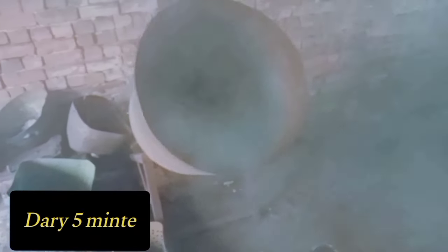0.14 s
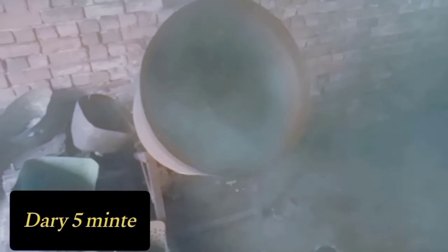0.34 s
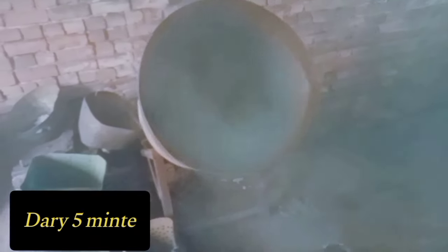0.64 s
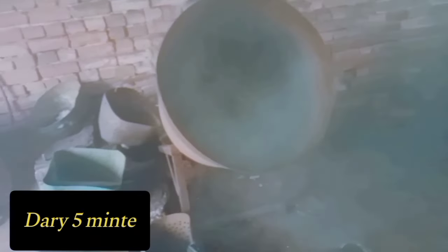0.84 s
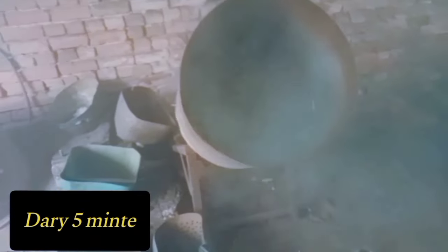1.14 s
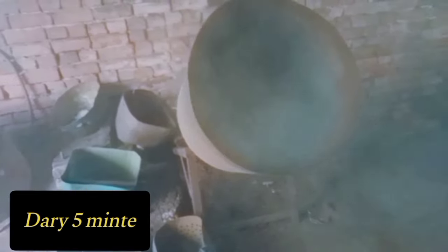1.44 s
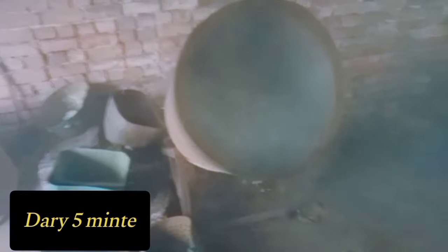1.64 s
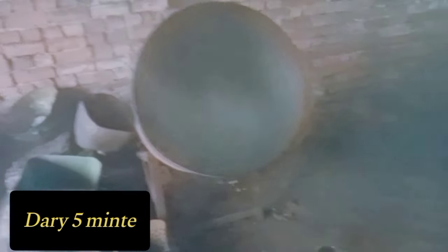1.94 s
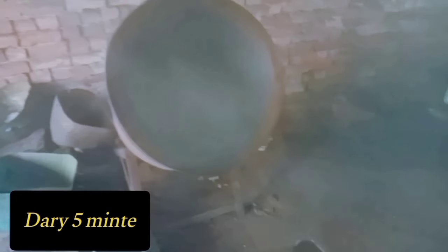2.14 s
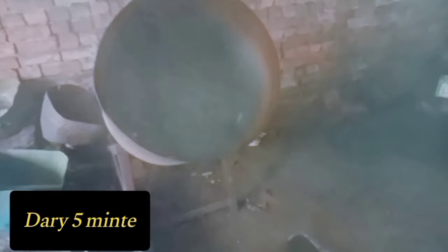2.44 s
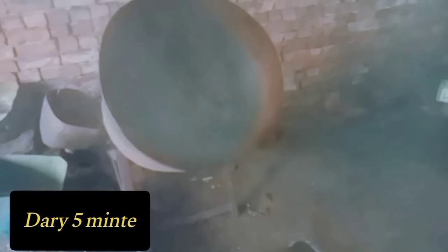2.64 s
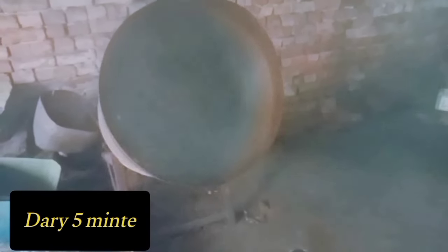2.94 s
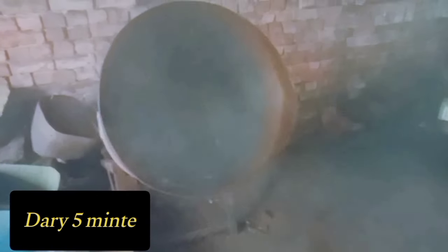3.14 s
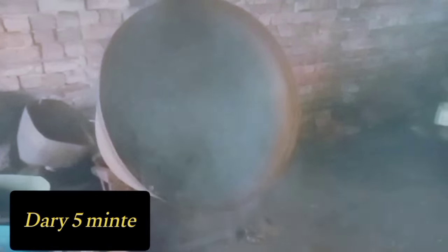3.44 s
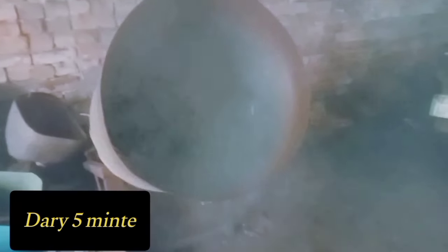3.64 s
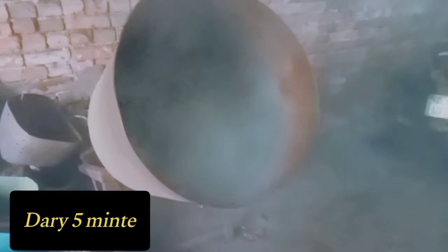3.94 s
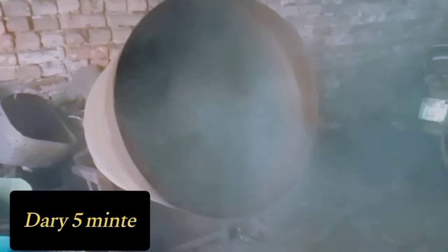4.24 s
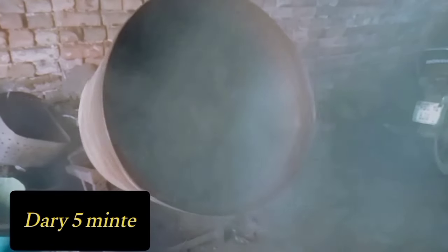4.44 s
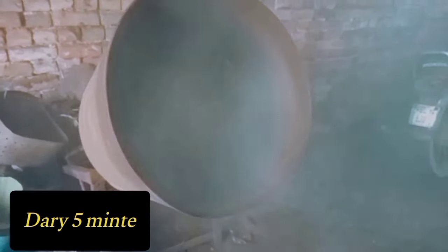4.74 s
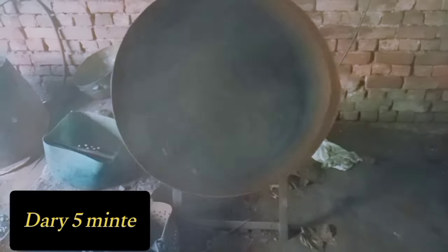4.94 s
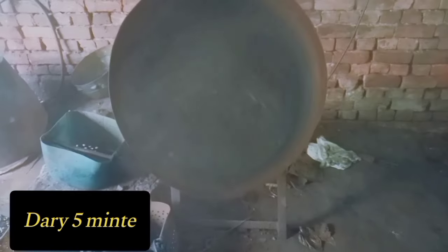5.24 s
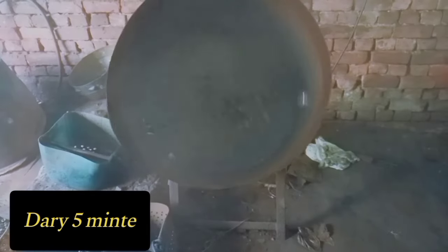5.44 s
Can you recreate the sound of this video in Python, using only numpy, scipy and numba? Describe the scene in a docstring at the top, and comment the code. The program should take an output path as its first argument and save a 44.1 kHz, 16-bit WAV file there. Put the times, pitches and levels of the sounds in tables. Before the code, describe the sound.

Small steel pieces tumble in a turning steel drum with a dense, hissing metallic rattle, while air puffs on the microphone.

```python
"""Small steel pieces tumble in a turning steel drum in a brick workshop, close to a hand-held microphone.
From the start, thousands of collisions a second ring the wall and the pieces and merge into a hissing
rattle over the drum's low roll. All along it surges as the load slides, heavier pieces clank, and puffs
of air pop on the microphone, thickest around 2.8 s and 4 s. At 4.7 s the sound cuts and fades back in."""
import sys
import numpy as np
from scipy import signal
from scipy.fft import rfft, irfft, next_fast_len
from scipy.io import wavfile
from scipy.ndimage import uniform_filter1d
from numba import njit

SR = 44100
rng = np.random.default_rng(int(sys.argv[2]) if len(sys.argv) > 2 else 0)


def unload_wav(signal):
    """Save mono or channel-first audio to the path in sys.argv[1] as 16-bit WAV at rate SR, clipped to [-1, 1]."""
    wavfile.write(
        sys.argv[1],
        SR,
        np.round(np.clip(np.atleast_2d(signal).T, -1, 1) * 32767).astype(np.int16),
    )


N = 246078

# EQ of the drum rolling on its frame: (frequency [Hz], gain [dB])
RUMBLE_EQ = [(15, -68), (25, -29), (168, -3.5), (263, -13.5), (479, -10), (583, -19), (798, -12), (900, -6),
             (1170, -24), (1980, -120)]
# puffs of air on the microphone: (time [s], level [dB], pace [Hz]); the swing runs at 0.7 of the pace
AIR_PUFFS = [(0.133, -16, 141.0), (0.92, -27, 171), (1.206, -19, 296.0), (1.238, -20, 250),
             (1.384, -22, 250), (1.451, -9.5, 226), (1.837, -25, 256.0), (1.924, -22, 200),
             (2.379, -23, 132.0), (2.593, -16.5, 134.0), (2.624, -17, 137), (2.726, -17, 202),
             (2.745, -14, 161), (2.756, -7.5, 215), (2.772, -17, 200), (2.779, -14, 135.0),
             (2.789, -12.5, 185.0), (2.815, -19, 151.0), (2.907, -12, 144), (3.535, -23, 140),
             (3.592, -15.5, 144), (3.728, -17, 216), (3.74, -23, 132.0), (3.754, -13.5, 161.0),
             (3.782, -17, 148.0), (3.843, -16, 180), (3.853, -17, 155.0), (3.863, -19, 223.0),
             (3.891, -15.5, 152), (3.898, -12, 128), (3.966, -16, 228.0), (3.978, -13, 153.0),
             (3.989, -16, 163.0), (3.997, -14.5, 147), (4.025, -20, 319.0), (4.104, -19, 238.0),
             (4.112, -18, 190.0), (4.133, -17, 139), (4.147, -15, 196.0), (4.158, -19.5, 115.0),
             (4.316, -12.5, 147), (4.37, -21, 200), (4.382, -13, 154.0), (4.483, -27, 200),
             (4.504, -22, 180), (4.548, -20.5, 138), (4.577, -20, 185.0), (4.815, -15.5, 136),
             (4.901, -24, 270), (4.958, -16.5, 146), (5.034, -17, 134), (5.165, -22, 150)]
# heavier pieces that strike the wall alone: (time [s], level [dB], pitch [Hz])
HEAVY_HITS = [(0.105,-11,3270),(1.235,-8,3100),(1.3032,-11.5,3160),(1.4067,-7,3070),(1.949,-8,3260),(2.0754,-8.5,3580),(2.473,-8,3140),(2.6244,-7.5,3270),(2.6855,-8,3220),(3.116,-12,3050),(3.146,-10,3250),(3.4855,-14,3430),(3.5756,-6.5,3130),(3.6396,-11,2930),(4.101,-15,3250),(4.6209,-15,3300),(5.1543,-14,3300),(5.247,-20,3270)]
# EQ of a collision heard through drum mouth and microphone: (frequency [Hz], gain [dB])
COLLISION_EQ = [(180, -31.5), (300, -23), (756, -17), (1460, -11), (1870, -9), (2030, -8), (3230, -3),
                (3620, -13), (3870, -11.5), (4130, -15), (4800, -18.5), (5290, -20), (5700, -14.5),
                (6240, -13.5), (7300, -21), (7800, -21.5), (12700, -30.5), (15500, -36.5)]
# slow drift between the surges: (time [s], rattle gain [dB], wall boost [dB], treble boost [dB])
LOAD_DRIFT = [(0, -1.04, 2.5, -1.8), (.7, -1.04, 1, 0), (1.3, -1.5, 1, -1), (1.7, -0.7, 1.5, 1),
              (2.08, -2.5, 2.5, .5), (2.5, 0, 1, 0), (3.1, 0, 0, -1), (3.52, -0.3, -0.5, -2),
              (3.85, .5, -0.5, -1.5), (4.25, -1, -0.1, 0), (4.68, 0.5, 0, -3.5), (4.72, -2.5, 0.5, -1),
              (4.85, -2.5, 2.5, -2.5), (5.2, -1.8, 3.5, -1), (5.42, -1, 1, -3.5), (5.58, -.5, 1, -4.5)]
# part of the load slides down at once: (time [s], rattle gain [dB], wall boost [dB], treble boost [dB])
LOAD_SURGES = [(0.131, 1.5, 1, 0), (0.281, 2.5, -1, 2.5), (0.413, 3.5, -3, 1.5), (0.578, 4, -0.5, -2),
               (0.907, 1, 2.5, 0), (1.075, 2.4, 1.2, -5), (1.195, 6, -1.6, -1), (1.382, 2, 1, 1),
               (1.718, 0.9, 0.2, 0), (1.941, 3.3, 0.5, -2), (2.233, 0.5, 2, 1), (2.387, 1.5, -4.5, 0.5),
               (2.606, -1, 5.5, 0.5), (2.752, 2.5, 2, 0), (3.066, 2.6, -3, -3), (3.305, 2, 1, 0.9),
               (3.606, 2, 0, -3.5), (3.87, 2.5, -1, 1.5), (3.993, 1.5, 2.5, -1.5), (4.108, 0.4, 5.5, -2),
               (4.334, 3, -1.8, 0), (4.654, 1.1, 0.5, -2.2), (4.981, 1.8, 1.5, 2), (5.166, 3.5, -1.3, 0),
               (5.292, 3, 0.5, -3), (5.503, 3, -0.1, 2)]
# brief bright sprays of small pieces: (time [s], treble boost [dB])
BRIGHT_SPRAYS = [(.095, 4), (.57, 4), (.745, 5), (.845, 7), (1.335, 6), (1.84, 3), (2.39, 4.5), (3.3, 4)]

RUMBLE_DB, RATTLE_DB = -43, -16
SURGE_RISE_S, SURGE_FALL_S, SPRAY_S = 0.031, 0.046, 0.008
LULL_SHARE, LULL_AFTER_S, LULL_S = 0.2, 0.085, 0.057
WALL_HZ, TAIL_T60_S = 3225, 0.049
CUT_S, FADE_S, LOWPASS_HZ = 4.7, 0.14, 15490


def amp(db):
    """Decibels to gain."""
    return 10 ** (np.asarray(db) / 20)


def unit(x):
    """Scales to an RMS of one."""
    return x / np.sqrt(np.mean(x ** 2) + 1e-20)


def equalise(x, curve):
    """Plays a sound through an EQ curve, at unit RMS."""
    size = next_fast_len(N)
    hz, db = np.transpose(curve)
    gain_db = np.interp(np.log(np.fft.rfftfreq(size, 1 / SR) + 1), np.log(hz + 1), db)
    return unit(irfft(rfft(x, size) * amp(gain_db), size)[:N])


def strikes(per_s, spread_db):
    """Random collisions of either sign, mostly small, a few large."""
    chance, side, luck = rng.random((3, N))
    strength = amp(spread_db * np.minimum(-np.log(1 - luck), 4))
    return strength * np.sign(side - .5) * (chance < per_s / SR)


def frame_rumble():
    """The drum rolls on its frame: a low bed of small bumps over steady noise."""
    roll = rng.standard_normal(N) + 1.65 * unit(strikes(per_s=200, spread_db=4.1))
    return amp(RUMBLE_DB) * equalise(roll, RUMBLE_EQ)


def microphone_pops():
    """Each puff pushes the membrane fast; it swings back once and settles, with a brief rough flutter."""
    out, t = np.zeros(N + 2000), np.arange(2000) / SR
    band = signal.butter(2, [120, 650], "band", fs=SR, output="sos")
    flutters = unit(signal.sosfilt(band, rng.standard_normal((len(AIR_PUFFS), len(t)))))
    for (s, db, pace), flutter in zip(AIR_PUFFS, flutters):
        turns = pace * t
        push = np.sin(np.pi / 2 * np.clip(turns / 0.1, 0, 1)) ** 2 * np.exp(-2.4 * turns)
        swing = push * np.cos(2 * np.pi * (turns - .1) * 0.7)
        at = round(s * SR) - swing.argmax()  # the peak lands on the cue
        out[at:at + len(t)] += amp(db) * (swing + 0.35 * flutter * np.sqrt(push)) / swing.max()
    return out[:N]


def wall_clanks(t60=0.059):
    """A heavier piece rings the wall briefly, as a close pair of tones."""
    out, t = np.zeros(N + 2000), np.arange(2000) / SR
    for s, db, hz in HEAVY_HITS:
        ring = np.sin(2 * np.pi * hz * t) + 0.32 * np.sin(2 * np.pi * 1.2 * hz * t)
        envelope = amp(db - 60 * t / t60) * (1 - np.exp(-t / 0.00025))
        out[round(s * SR):][:len(t)] += envelope * ring
    return out[:N]


@njit
def add_tones(out, starts, sizes, phase_steps, envelope):
    """Adds one dying tone for each hit; a sine follows from its last two samples."""
    for at, size, step in zip(starts, sizes, phase_steps):
        feedback = 2 * np.cos(step)
        old, new = 0., size * np.sin(step)
        for n in range(min(len(envelope), len(out) - at)):
            out[at + n] += envelope[n] * new
            old, new = new, feedback * new - old


def steel_rings(hz, spread_hz, t60, per_s, spread_db):
    """Every collision rings its own spot, the pitches scattered round a common one."""
    out, t = np.zeros(N), np.arange(0, 0.88 * t60, 1 / SR)
    hits = strikes(per_s, spread_db)
    detune = rng.logistic(size=N)
    pitch = abs(hz + spread_hz * detune)
    hits *= np.exp(-(detune / 6) ** 2)  # far from the common pitch, rings are weak
    at = np.flatnonzero(hits)
    envelope = amp(-60 * t / t60) * (1 - np.exp(-t / 0.00077))
    add_tones(out, at, hits[at], 2 * np.pi * pitch[at] / SR, envelope)
    return unit(out)


def load_rides(t):
    """Level, wall and treble rides in dB: slow drift plus each slide's surge and the lull behind it."""
    drift_s, *drifts = np.transpose(LOAD_DRIFT)
    surge_s, *lifts = np.transpose(LOAD_SURGES)
    since = t - surge_s[:, None]
    surge = np.exp(-(since / np.where(since < 0, SURGE_RISE_S, SURGE_FALL_S)) ** 2)
    lull = LULL_SHARE * np.exp(-((since - LULL_AFTER_S) / LULL_S) ** 2)
    drift = np.array([np.interp(t, drift_s, db) for db in drifts])
    return drift + np.array(lifts) @ (surge - lull)


def tumble(x, flicker_db, grit_db, knock_db, patch_db):
    """The load rides level, wall band and treble; clumps add flicker and drifting patches of colour."""
    hz, t, spectrum = signal.stft(x, SR, nperseg=512, noverlap=384)
    level_db, wall_db, treble_db = load_rides(t)
    treble_db += sum(db * np.exp(-((t - s) / SPRAY_S) ** 2) for s, db in BRIGHT_SPRAYS)
    smooth = uniform_filter1d
    flicker = unit(smooth(smooth(rng.standard_normal(len(t)), 9), 7))
    grit = unit(smooth(rng.exponential(size=len(t)) - 1, 10))  # bursts of small pieces
    knock = unit(smooth(rng.standard_normal(len(t)), 6))  # uneven blows on the wall
    patches = unit(smooth(smooth(rng.standard_normal(spectrum.shape), 9, axis=0), 18, axis=1))
    wall_bell = np.exp(-(np.log2((hz + 1) / WALL_HZ) / 0.35) ** 2)[:, None]
    treble_shelf = np.clip(np.log2((hz + 1) / 6000) / .7, 0, 1)[:, None]
    gain_db = level_db + flicker_db * flicker + patch_db * patches
    gain_db += wall_bell * (wall_db + knock_db * knock)
    gain_db += treble_shelf * (treble_db + grit_db * grit)
    return signal.istft(spectrum * amp(gain_db), SR, nperseg=512, noverlap=384)[1][:N]


def drum_rattle():
    """Ticks with a hissing tail of echoes inside the drum, layered with clinks and ringing steel."""
    ticks = strikes(per_s=5000, spread_db=2.67)
    power_decay = amp(-120 * np.arange(4096) / SR / TAIL_T60_S)
    tail_power = signal.oaconvolve(ticks ** 2, power_decay)[:N]
    tails = np.sqrt(abs(tail_power)) * rng.standard_normal(N)
    clinks = steel_rings(hz=3997, spread_hz=2596.5, t60=0.07, per_s=2500, spread_db=3.45)
    clatter = equalise(unit(ticks) + amp(2) * unit(tails) + amp(-3) * clinks, COLLISION_EQ)
    wall = steel_rings(hz=WALL_HZ, spread_hz=200, t60=0.58, per_s=1000, spread_db=2.73)
    pieces = steel_rings(hz=6129, spread_hz=31, t60=0.06, per_s=1200, spread_db=2.6)
    mix = clatter + amp(-.5) * wall + amp(-14) * pieces
    return amp(RATTLE_DB) * unit(tumble(mix, flicker_db=0.3, grit_db=0.68, knock_db=1.56, patch_db=1.36))


def scene():
    """All four layers, dead centre."""
    return np.tile(drum_rattle() + wall_clanks() + frame_rumble() + microphone_pops(), (2, 1))


def record(dry):
    """One microphone feeds both channels: bass cut, soft overload, the cut with its fade-in, low-pass."""
    thin = signal.sosfilt(signal.butter(3, 60, "high", fs=SR, output="sos"), dry.mean(axis=0))
    saturated = .9 * np.tanh(thin / .9)
    since = np.arange(N) / SR - CUT_S
    fade = np.where(since < 0, 1, np.clip(.045 + since / FADE_S, 0, 1) ** 1.1)
    lowpass = signal.firwin(2047, LOWPASS_HZ, window=("kaiser", 9), fs=SR)
    return np.tile(signal.oaconvolve(saturated * fade, lowpass, "same"), (2, 1))


dry = scene()
out = record(dry)
unload_wav(out)
```